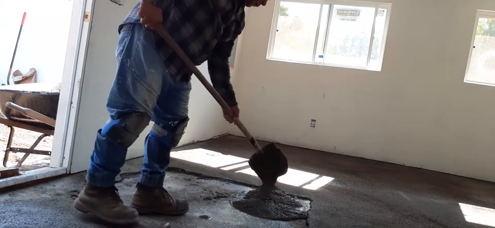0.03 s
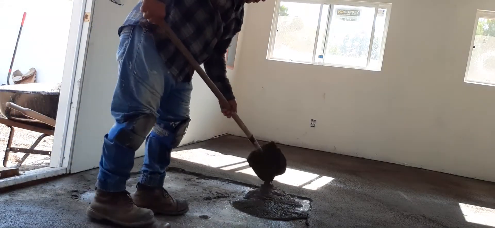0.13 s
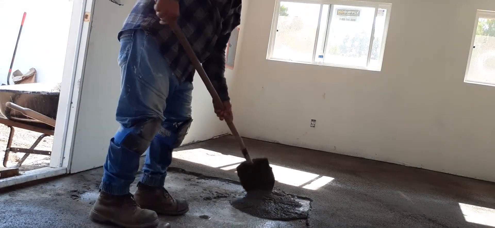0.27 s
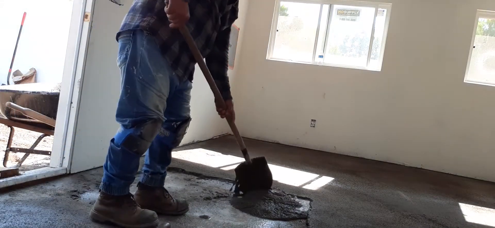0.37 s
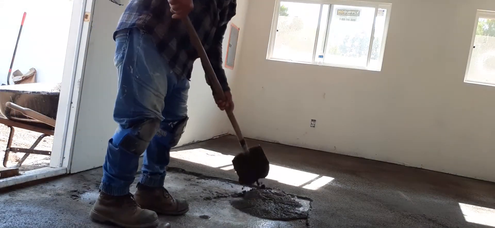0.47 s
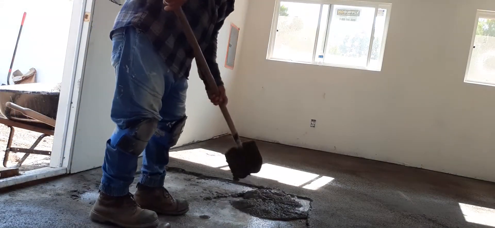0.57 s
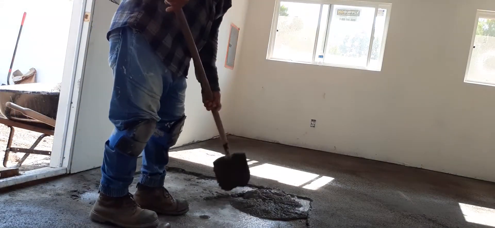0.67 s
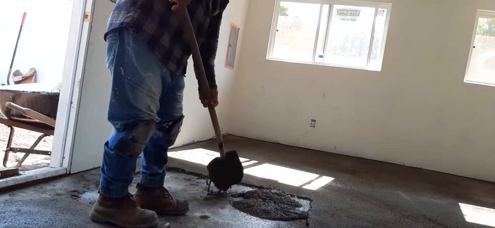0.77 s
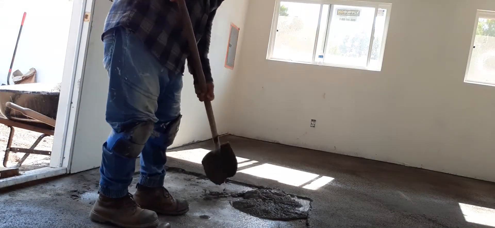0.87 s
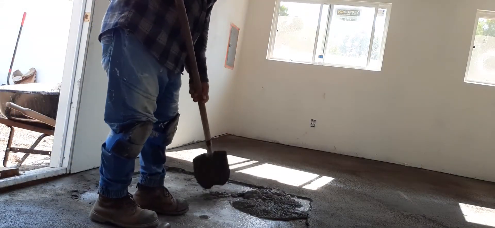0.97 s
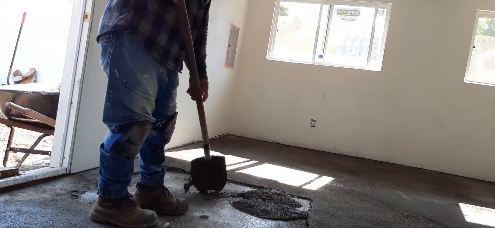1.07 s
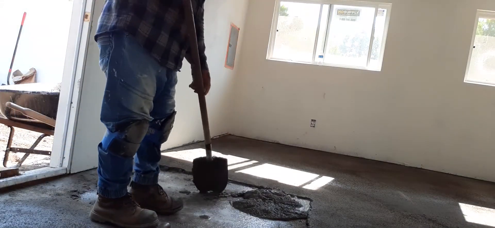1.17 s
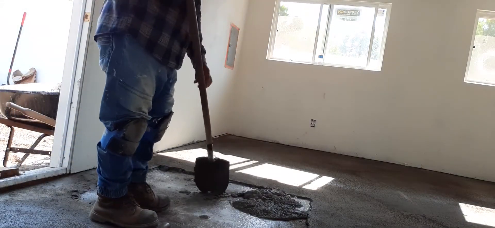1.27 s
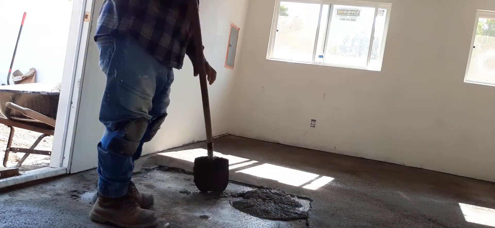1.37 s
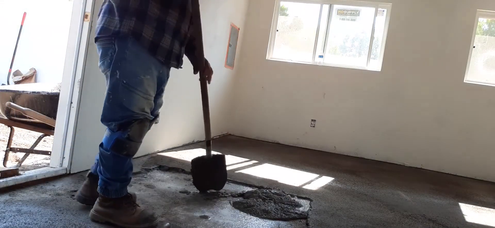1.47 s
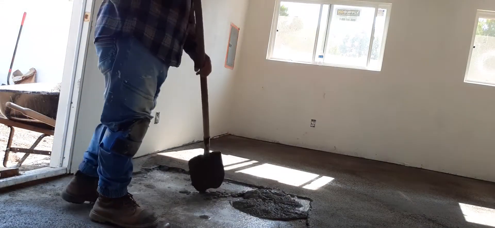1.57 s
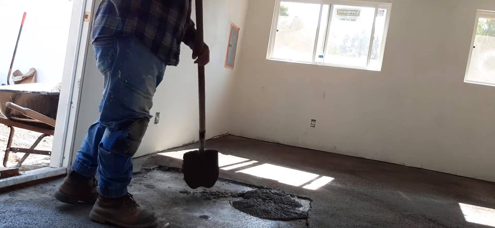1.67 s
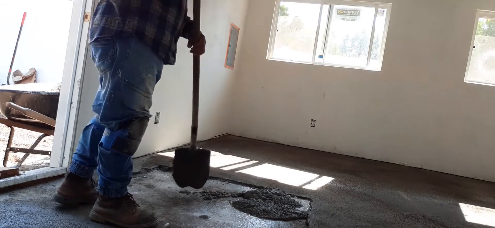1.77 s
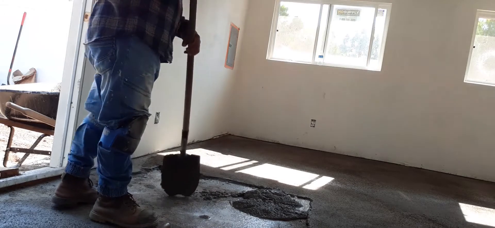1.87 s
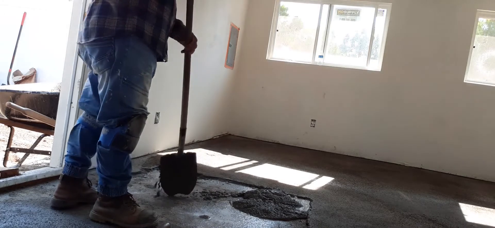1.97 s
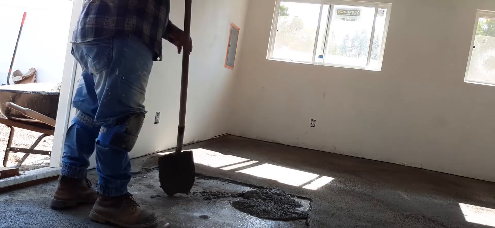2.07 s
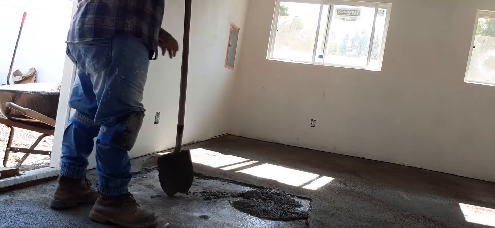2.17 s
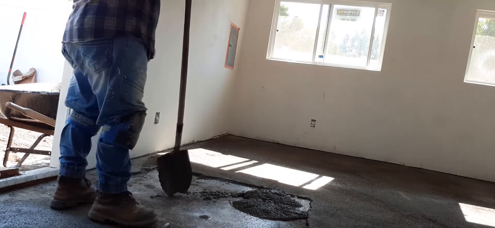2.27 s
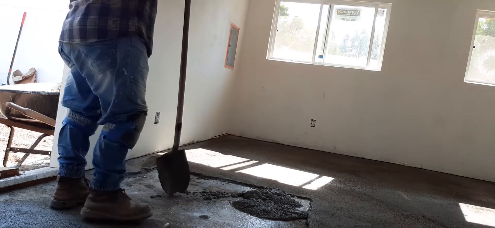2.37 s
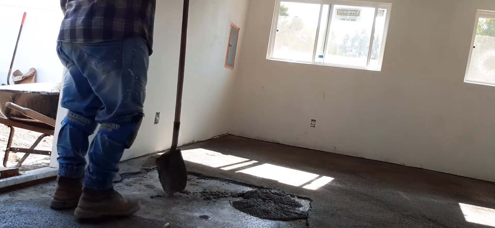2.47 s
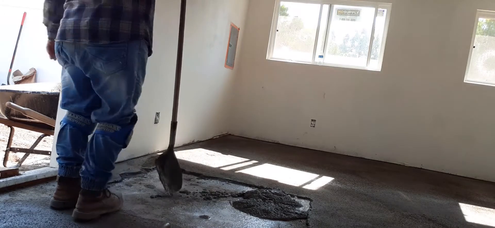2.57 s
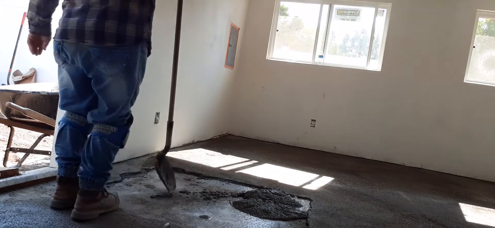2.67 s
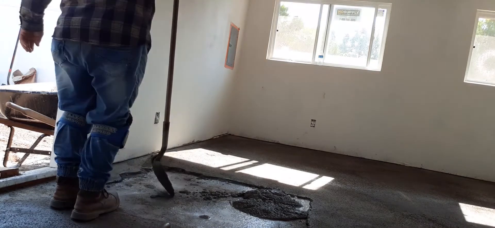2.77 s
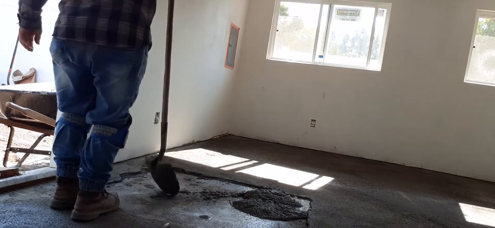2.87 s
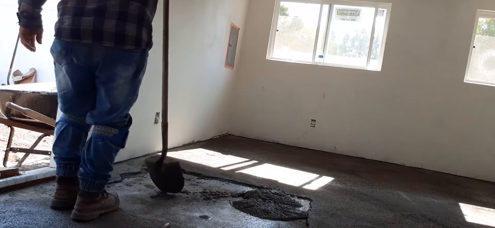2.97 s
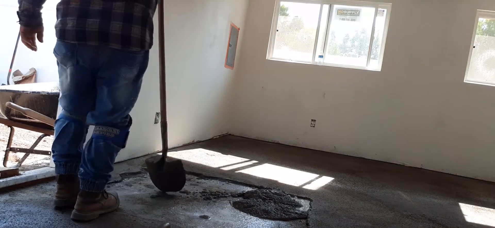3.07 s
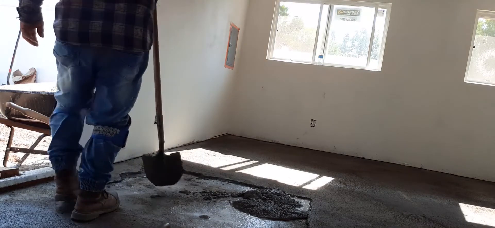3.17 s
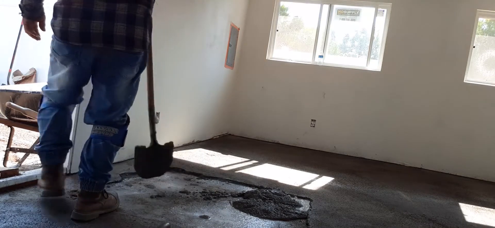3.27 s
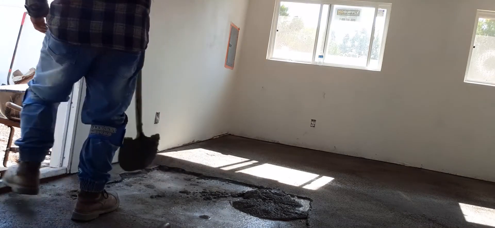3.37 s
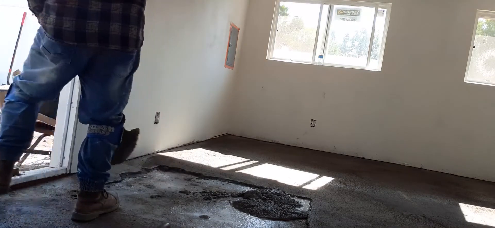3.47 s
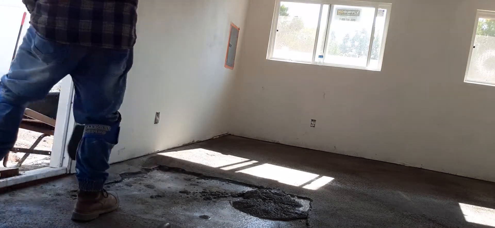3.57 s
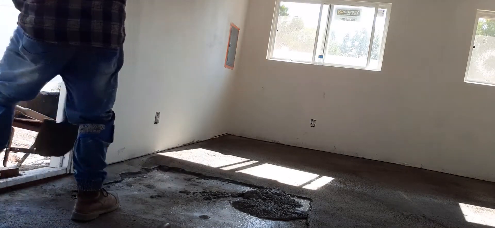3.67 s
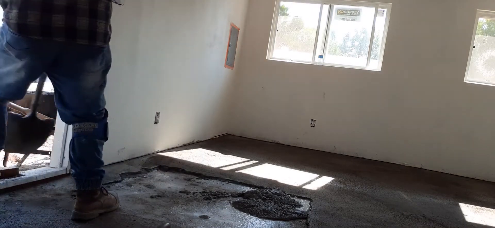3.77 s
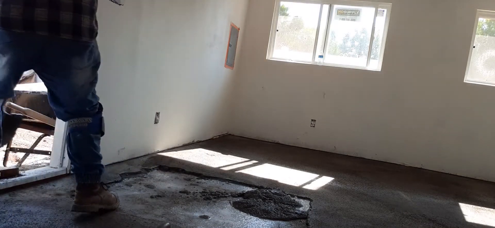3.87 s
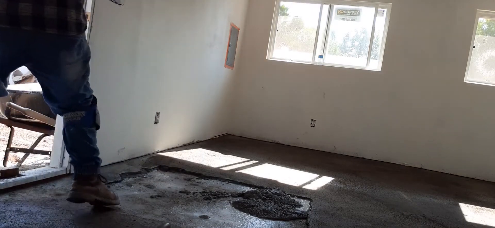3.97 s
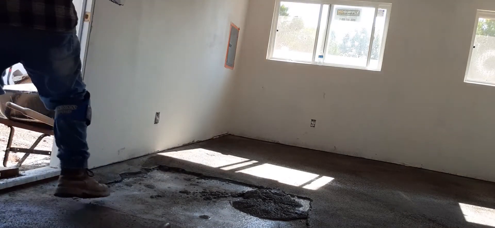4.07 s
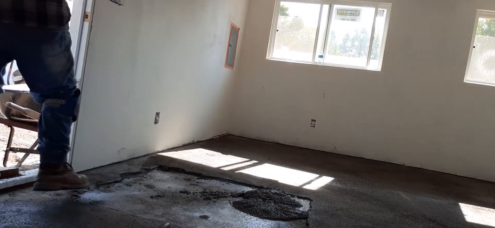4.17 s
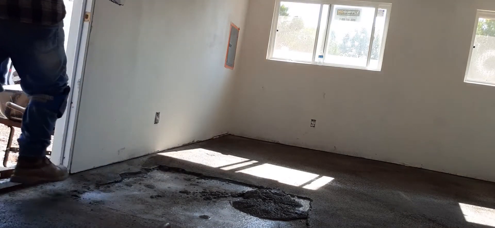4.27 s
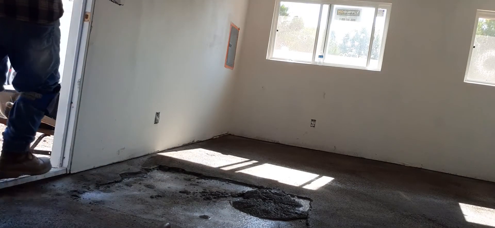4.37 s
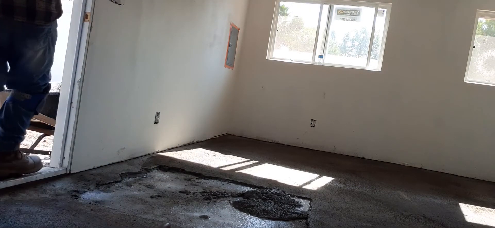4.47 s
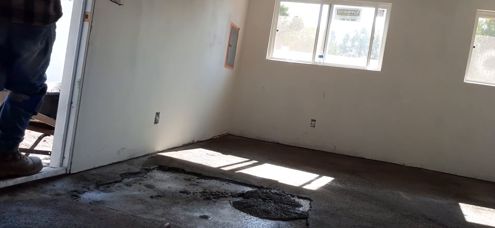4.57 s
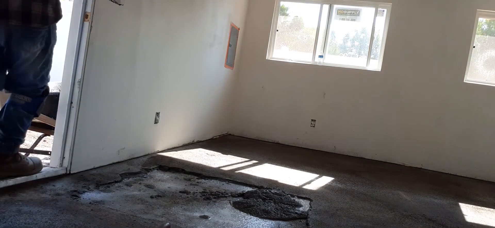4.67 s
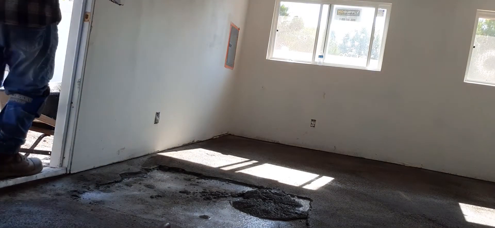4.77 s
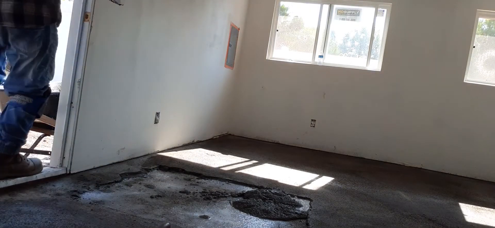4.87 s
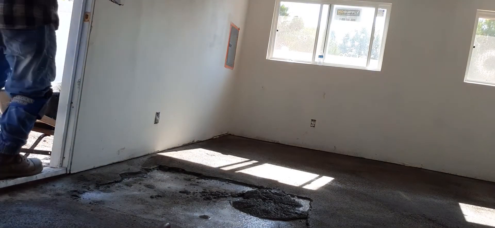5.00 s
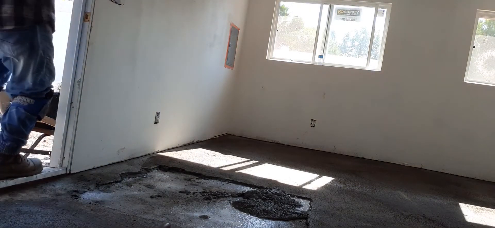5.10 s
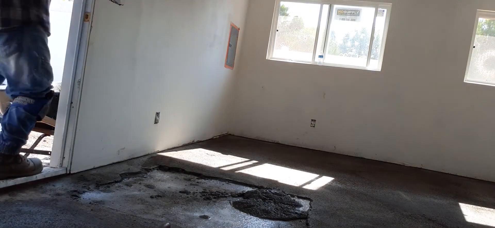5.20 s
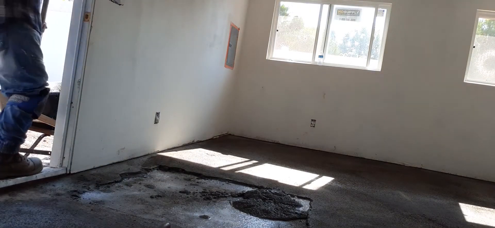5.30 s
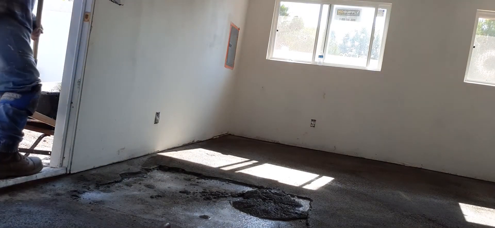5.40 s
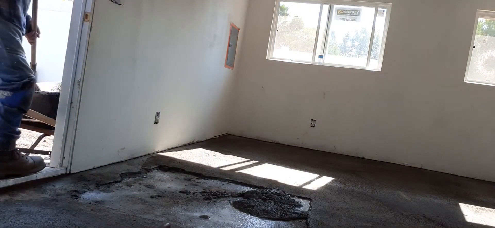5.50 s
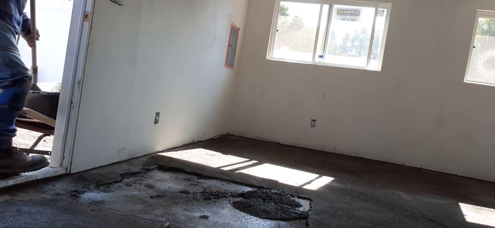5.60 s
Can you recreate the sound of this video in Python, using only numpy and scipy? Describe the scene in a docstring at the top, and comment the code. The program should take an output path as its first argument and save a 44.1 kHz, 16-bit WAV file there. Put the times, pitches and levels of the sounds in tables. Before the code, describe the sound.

Heavy wet thuds and a steel clink ring through an empty garage, followed by footsteps, gritty scrapes and shovelling in a metal tray.

```python
"""Wet concrete in a garage

In a bare, echoing garage, lumps of wet concrete drop off a shovel: thud, popping air pockets and spray.
The blade clinks and rasps on the slab as ringing steel; boots thump and scuff, and once the blade slides,
as bursts of grit. Stones snap, and the shovel digs into the mix in a steel wheelbarrow just outside.
A faint wash of filtered noise comes from the open door; decaying noise gives the room its echoes."""
import sys
import numpy as np
from scipy import signal
from scipy.fft import rfft, irfft, next_fast_len
from scipy.io import wavfile
from scipy.ndimage import map_coordinates

SR = 44100
rng = np.random.default_rng(int(sys.argv[2]) if len(sys.argv) > 2 else 0)


def generate_wav(signal):
    """Clip the signal to [-1, 1] and save it as 16-bit WAV at the path in sys.argv[1]."""
    frames = np.transpose(np.atleast_2d(signal))
    scaled = np.clip(frames, -1, 1) * 32767
    pcm = np.round(scaled).astype(np.int16)
    wavfile.write(sys.argv[1], SR, pcm)


N = 248724
RUMBLE_HZ, TOP_HZ = 55.5, 16000  # low-cut corner and upper band limit


# lumps landing: start_s, thud_db, push_db, big_pocket_hz, big_pocket_db,
# small_pocket_hz, small_pocket_db, spray_db, spray_delay_s
LUMPS = [(.3045, 13, 6, 245, 13, 677, 15.5, 3, 0.001), (0.715, 19.5, 3.5, 390, 0, 1400, 3.5, 3, 0.00091),
         (1.0267, 18, 3, 704, 15.5, 1094, 6, 2.5, 0.014), (1.888, 9.5, -1, 457, -20, 1020, 1, 0.5, 0.0041)]
# colour of the thud: freq_hz, level_db
THUD_SPECTRUM = [(25, -93), (50, -51), (80, -2.5), (150, -15.5), (250, 6.5), (450, 6.5), (740, 0.5),
                 (870, -7.5), (1100, -6), (1350, -22.5), (2200, -24.5), (3300, -41.5), (8000, -60)]
# the soft mass flattening: pitch_hz, level_db, t60_s
PUSH_MODES = [(124.4, 12, 0.069), (166.7, 7, 0.19)]
# standing waves of the room: pitch_hz, level_db, t60_s
STANDING_WAVES = [(112.1, -11, 0.47), (182, -3.5, 0.62), (238, 9, 0.49), (267.4, 3.5, 0.88), (437, -4.5, 1),
                  (482, 3, 1), (601, -11, 0.98), (712, -1.5, 0.81)]


def lumps():
    """Each lump lands flat, pops the air trapped under it, sprays, and wakes the room's standing waves."""
    out = np.zeros((2, N))
    for start, thud_db, push_db, big_hz, big_db, small_hz, small_db, spray_db, spray_delay in LUMPS:
        # air pockets die by 60 dB in 9 or 11 cycles
        big_pocket = ring([(big_hz, 0, 9 / big_hz)])
        small_pocket = ring([(small_hz, 0, 11 / small_hz)])
        slap = np.zeros(SR // 4)
        add(slap, 0.0006, -amp(thud_db) * pulse(THUD_SPECTRUM))
        add(slap, 0.003, amp(big_db) * big_pocket)
        add(slap, 0.005, amp(small_db) * small_pocket)
        flying = spray(life=0.026, bubble_hz=10700, cycles=5.6, bubble_share=0.11)
        add(slap, spray_delay, amp(spray_db) * flying)
        add(out, start, garage(slap, direct_db=-9.0, build=0.0026))
        add(out, start, -amp(push_db) * ring(PUSH_MODES))
        add(out, start + 0.0051, amp(thud_db - 5.0) * ring(STANDING_WAVES))
    return out


# colour of bright, small fractures, in spray and in stones: freq_hz, level_db
SPRAY_SPECTRUM = [(700, 2), (1800, 3.5), (2500, -0.5), (3500, -5.5), (6000, -5.5), (8000, -4.5),
                  (11500, -4), (15500, -12.5)]


def spray(life, bubble_hz, cycles, bubble_share, count=16):
    """Flying slurry: a dying crackle with a few tiny bursting bubbles, each a short sine."""
    t = np.arange(SR // 4) / SR
    fading = grit(rate=1500, spread_db=4, smooth=0.24, size=len(t)) * np.exp(-t / life)
    crackle = through(fading, pulse(SPRAY_SPECTRUM))
    age = np.maximum(t - rng.exponential(life, (count, 1)), 0)
    hz = np.minimum(bubble_hz * np.exp(rng.normal(0, 0.247, (count, 1))), TOP_HZ)
    bubbles = np.sum(np.sin(2 * np.pi * hz * age) * np.exp(-age * hz / cycles), axis=0)
    return one_blow(one_blow(crackle) + bubble_share * one_blow(bubbles))


# the blade's edge meeting the slab: start_s, level_db
CLINKS = [(1.045, -8.5), (1.893, -14), (1.897, 1.5), (2.684, -19)]
# the blade ringing free: pitch_hz, level_db, t60_s
BLADE_MODES = [(1936, -6.5, 0.0096), (2360, -0.5, 0.015), (2477, -0.5, 0.017), (4117, -9.5, 0.048),
               (4290, -7.5, 0.028), (4900, -7, 0.01), (7900, -14, .012)]
# the edge dragged, a shove and a follow-through: start_s, length_s, level_db
DRAGS = [(2.852, 0.05, -24), (2.945, 0.069, -34)]
# colour of the rasp: freq_hz, level_db
RASP_SPECTRUM = [(60, -13), (290, -17.5), (400, 1.5), (700, -6.5), (1200, 0.5), (2200, -9), (3500, -10.5),
                 (7000, -11.5), (12000, -12), (16000, -22)]
# the blade ringing while pressed down: pitch_hz, level_db, t60_s
PRESSED_MODES = [(513, -7, 0.065), (715, 3.5, 0.079), (980, 0.5, 0.076), (1470, -18, 0.074),
                 (1830, -3, 0.038), (2210, -5, 0.027), (2590, -1, 0.022)]


def blade():
    """The steel edge clinks on the slab, then rasps over it: stick-slip grit drives the blade."""
    steel = np.zeros(N)
    for start, level_db in CLINKS:
        add(steel, start, amp(level_db) * ring(BLADE_MODES))
    chatter = judder(rate=220, depth_db=1.8)
    press, = strokes(DRAGS, attack_s=0.0078, release_s=0.014, sag_db_per_s=46)
    rub = press * grit(rate=1800, spread_db=4.5, smooth=0.35) * chatter
    rasp = amp(-2.5) * through(rub, pulse(RASP_SPECTRUM))
    rasp += amp(-5.0) * through(rub, ring(PRESSED_MODES))
    return garage(steel + rasp, direct_db=-7.5)[:, :N]


# boots coming down: start_s, level_db
STEPS = [(0.11, -17), (.176, -6), (2.59, -15.5), (2.628, -12), (3.603, -4.5), (4.26, -40), (4.474, -12),
         (4.61, -7), (5.112, -11)]
# colour of the heel thump: freq_hz, level_db
HEEL_SPECTRUM = [(30, -4), (100, -9.5), (220, -5.5), (410, -1), (620, -10), (1000, -8.5), (2000, -33),
                 (5000, -32), (15000, -44)]
# soles, and once (at 1.92 s) the blade, sliding on the gritty slab: start_s, length_s, rub_db, sand_db
SLIDES = [(0, 0.044, -51.5, -49), (.105, 0.46, -40.5, -44.5), (.18, 0.012, -27.5, -53),
          (1.26, 0.064, -47.5, -48.5), (1.445, 0.18, -49.5, -53), (1.695, 0.22, -54.5, -53),
          (1.92, 0.097, -34, -62), (2.13, 0.44, -55, -55), (2.612, 0.032, -40.5, -42.5),
          (2.675, 0.14, -56, -55.5), (3.5, 0.036, -65, -74), (3.615, 0.079, -35, -52.5),
          (3.712, 0.061, -27.5, -66), (3.895, 0.047, -56.5, -54), (4.108, 0.27, -52, -66),
          (5.11, .05, -60, -61)]
# colour of the rubbing slides: freq_hz, level_db
SLIDE_SPECTRUM = [(35, -54), (60, -17.5), (346, -5), (437, -4), (732, -4), (862, -1), (1140, -3.5),
                  (2250, -9.5), (2470, -10.5), (2770, -16.5), (16000, -42)]


def boots_and_slides():
    """Heels thump through a cushion of sand; soles, and once the blade, stick, slip and grind."""
    rub, sand = strokes(SLIDES, attack_s=0.0091, release_s=0.0078, sag_db_per_s=17.5)
    rubbing = rub * grit(rate=600, spread_db=3.0, smooth=0.26) * judder(rate=100, depth_db=5.0)
    floor = through(rubbing, pulse(SLIDE_SPECTRUM)) + crushed_sand(sand)
    for start, level_db in STEPS:
        add(floor, start, amp(level_db) * crunch(pulse(HEEL_SPECTRUM), life=0.0032))
    return garage(floor, direct_db=-12.5)[:, :N]


# single stones cracking: start_s, level_db
STONES = [(0.151, -21), (0.199, -25), (1.024, -5.5), (1.044, 0.5), (1.047, -20), (1.446, -27),
          (1.452, -20.5), (2.646, -32), (2.9537, -5), (3.755, -23), (3.91, -26), (4.213, -27.5),
          (4.253, -34.5), (4.599, -11.5)]


def stones():
    """Bits of gravel snap under steel or sole, each a very short burst of fractures."""
    snaps = np.zeros(N)
    for start, level_db in STONES:
        add(snaps, start, amp(level_db) * crunch(pulse(SPRAY_SPECTRUM), life=0.0022))
    return garage(snaps, direct_db=-6.0)[:, :N]


# pushes of the blade through the mix: start_s, length_s, push_db, sand_db
DIGS = [(4.507, 0.13, -39, -54), (4.615, 0.069, -34, -47), (4.73, 0.16, -50, -56),
        (4.97, 0.37, -52.5, -68.5), (5.415, 0.021, -42.5, -49.5), (5.45, 0.1, -42.5, -55.5),
        (5.53, .11, -39.5, -50.5)]
# colour of the gravelly mix: freq_hz, level_db
MIX_SPECTRUM = [(30, -32), (70, -7.5), (210, -16), (400, -3.5), (650, 4), (1150, -1), (1850, -5),
                (2900, -20.5), (3800, -20.5), (5500, -26.5), (16000, -49)]
# the blade knocking on the tray: start_s, knock_db, ring_db
KNOCKS = [(4.629, -14, 2), (4.71, -4, -31), (5.305, -17.5, -35), (5.372, -9.5, -30), (5.429, -3.5, -11.5),
          (5.539, -2.5, -7.5)]
# the steel tray ringing: pitch_hz, level_db, t60_s
TRAY_MODES = [(672, -10, 0.18), (804, -14, .15), (1192, -4, 0.11), (1295, -22, 0.076), (1614, -13, 0.081),
              (1920, 6.5, 0.023), (2055, 8.5, .025), (2190, -19, 0.018)]


def barrow():
    """The blade grinds through gravelly mix and knocks on the steel tray, which rings."""
    push, sand = strokes(DIGS, attack_s=0.014, release_s=0.0083, sag_db_per_s=11)
    grinding = push * grit(rate=600, spread_db=2.5, smooth=0.22) * judder(rate=110, depth_db=2.2)
    dig = through(grinding, pulse(MIX_SPECTRUM)) + crushed_sand(sand)
    for start, knock_db, ring_db in KNOCKS:
        add(dig, start, amp(knock_db) * crunch(pulse(MIX_SPECTRUM), life=0.0029))
        add(dig, start, amp(ring_db) * crunch(ring(TRAY_MODES), life=0.0028))
    return garage(dig, direct_db=-9)[:, :N]


# colour of the outdoor background: freq_hz, level_db
AIR_SPECTRUM = [(25, -23), (60, 3), (130, 2), (280, -4), (400, -2), (600, -6), (1100, -5), (1600, -17),
                (3000, -42), (4700, -20.5), (9000, -32), (12000, -43), (16000, -41)]


def outdoors():
    """A faint wash from the open door: wide filtered noise whose level wanders slowly."""
    wash = unit(filtered(diffuse(N), lambda hz: amp(along(AIR_SPECTRUM, hz))))
    return amp(-57.5) * wash * judder(rate=1.8, depth_db=-1.0)


def garage(x, direct_db, build=0.00059, count=3):
    """Direct sound plus echoes; the contact wanders among a few spots, each with its own tail."""
    spots = np.array([wobble(70, len(x)) for _ in range(count)])
    spots /= np.linalg.norm(spots, axis=0)
    out = sum(signal.fftconvolve((x * share)[None], tail(build), axes=1) for share in spots)
    add(out, 0, amp(direct_db) * x)
    return out


# how long the bare room rings: freq_hz, t60_s
GARAGE_DECAY = [(80, 0.5), (210, 0.52), (560, 0.99), (1470, 0.9), (3880, 0.77), (10200, 0.64),
                (16000, 0.47)]


def tail(build):
    """The bare walls' answer to one spot: noise where each frequency dies at its own speed."""
    hz, t, z = signal.stft(diffuse(SR), SR, nperseg=256)
    t60 = along(GARAGE_DECAY, hz)[:, None]
    fading = z * amp(-60 * t / t60) / np.sqrt(t60)
    echoes = signal.istft(fading, SR, nperseg=256)[1][:, :SR]
    arriving = 1 - np.exp(-(np.arange(SR) / SR / build) ** 2)  # reflections need time to arrive
    return np.sqrt(2) * one_blow(echoes * arriving)


# left-right likeness of diffuse sound: freq_hz, correlation (1 = same, -1 = opposite)
LIKENESS = [(130, 0.92), (290, 0.88), (640, 0.31), (1300, -0.22), (2400, -0.12), (4000, 0.03),
            (6000, -0.15), (9000, 0.29), (14000, 1)]


def diffuse(size):
    """Noise from all sides in two channels: a mid and side blend for each frequency."""
    def blend(hz):
        turn = np.arccos(np.clip(along(LIKENESS, hz), -1, 1)) / 2
        return np.array([np.cos(turn), np.sin(turn)])

    mid, side = filtered(rng.standard_normal((2, size)), blend)
    return np.array([mid + side, mid - side])


def strokes(rows, attack_s, release_s, sag_db_per_s):
    """One gain per sample for each dB column: a stroke bites, eases as it slows, and lets go."""
    age = np.arange(SR) / SR
    out = np.zeros((len(rows[0]) - 2, N))
    for start, length, *levels_db in rows:
        bite = np.minimum(age / attack_s, 1)
        let_go = np.exp(-np.maximum(age - length, 0) / release_s)
        force = bite * amp(-sag_db_per_s * age) * let_go
        add(out, max(start, 0), np.outer(amp(levels_db), force))
    return out


# colour of crushed sand: freq_hz, level_db
SAND_SPECTRUM = [(800, -12), (2000, 0), (4500, 2), (9000, -3), (12500, -3), (15500, -11.5)]


def crushed_sand(force):
    """Sparse, sharp cracks of sand being crushed, as loud as the force on it."""
    return through(force * grit(rate=550, spread_db=5, smooth=0.35), pulse(SAND_SPECTRUM))


def crunch(body, life):
    """A contact cushioned by sand: a brief swell of fractures into a body."""
    u = np.arange(SR // 8) / SR / life
    swell = np.sqrt(u) * np.exp(-u)
    fractures = grit(rate=3000, spread_db=5.0, smooth=0.23, size=len(u))
    return one_blow(signal.fftconvolve(fractures * swell, body))


def grit(rate, spread_db, smooth, size=N):
    """Tiny fractures of uneven size, rate a second on average, on a smooth hiss."""
    hits = rng.random(size) < rate / SR
    signs = rng.choice([-1, 1], size)
    sizes = amp(spread_db * np.minimum(rng.exponential(size=size), 3.5))
    return unit(unit(hits * signs * sizes) + smooth * rng.standard_normal(size))


def judder(rate, depth_db):
    """The uneven gain of something that sticks and slips, or just wanders when slow."""
    return unit(amp(depth_db * wobble(rate, N)))


def wobble(rate, size):
    """A smooth random curve, rate knots a second."""
    knots = rng.standard_normal(int(size * rate / SR) + 4)
    return map_coordinates(knots, [np.arange(size) * rate / SR])


def ring(modes):
    """Damped modes that swell within about half a cycle, at slightly new strengths for each blow."""
    t = np.arange(SR) / SR
    out = np.zeros(SR)
    for hz, level_db, t60 in modes:
        decay = amp(level_db + rng.normal() - 60 * t / t60)
        out += decay * np.sin(2 * np.pi * hz * t) * (1 - np.exp(-2 * hz * t))
    return one_blow(out)


def pulse(spectrum, size=4096):
    """The shortest causal push that has this spectrum (minimum phase)."""
    cepstrum = irfft(np.log(amp(along(spectrum, np.fft.rfftfreq(size, 1 / SR)))))
    cepstrum[1:size // 2] *= 2  # fold the backward half onto the forward half
    cepstrum[size // 2 + 1:] = 0
    return one_blow(irfft(np.exp(rfft(cepstrum))))


def through(x, body):
    """x exciting a body with the given impulse response."""
    return signal.fftconvolve(x, body)[:len(x)]


def filtered(x, response):
    """x times a response of frequency."""
    n = x.shape[-1]
    m = next_fast_len(n + 8192)  # room for the filter to ring out
    return irfft(rfft(x, m) * response(np.fft.rfftfreq(m, 1 / SR)), m)[..., :n]


def add(track, start, x):
    """Mix x into the track from start in seconds."""
    part = track[..., round(start * SR):][..., :x.shape[-1]]
    part += x[..., :part.shape[-1]]


def along(points, hz):
    """(Hz, value) points read on a log axis."""
    f, v = np.transpose(points)
    return np.interp(np.log(hz + 1), np.log(f + 1), v)


def amp(db):
    """Decibels to gain."""
    return 10 ** (np.asarray(db) / 20)


def unit(x):
    """x at rms 1."""
    return x / np.sqrt(np.mean(x ** 2) + 1e-20)


def one_blow(x):
    """x at total energy 1."""
    return x / (np.linalg.norm(x) + 1e-20)


def scene():
    """All the work and the background, mixed in stereo."""
    return lumps() + blade() + boots_and_slides() + stones() + barrow() + outdoors()


# balance of the two microphones: freq_hz, left_minus_right_db
MIC_BALANCE = [(200, -0.6), (650, -0.2), (1290, 4.5), (2380, 5.5), (4400, 1.1), (8100, 4.5), (15000, -0.5)]


def record(dry):
    """The left microphone is brighter; deep rumble and everything above the band limit are cut."""
    def microphones(hz):
        balance = amp(np.outer([1, -1], along(MIC_BALANCE, hz)) / 2)
        low_cut = (1j * hz / (RUMBLE_HZ + 1j * hz)) ** 2
        return balance * low_cut * (hz < TOP_HZ)

    return filtered(dry, microphones)


dry = scene()
out = record(dry)
generate_wav(out)
```